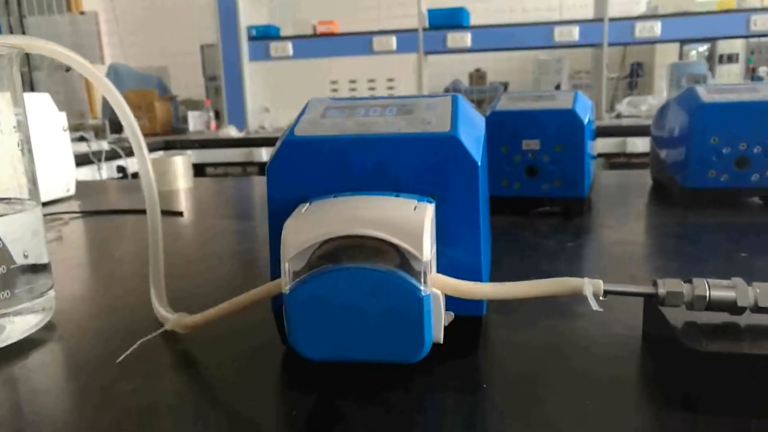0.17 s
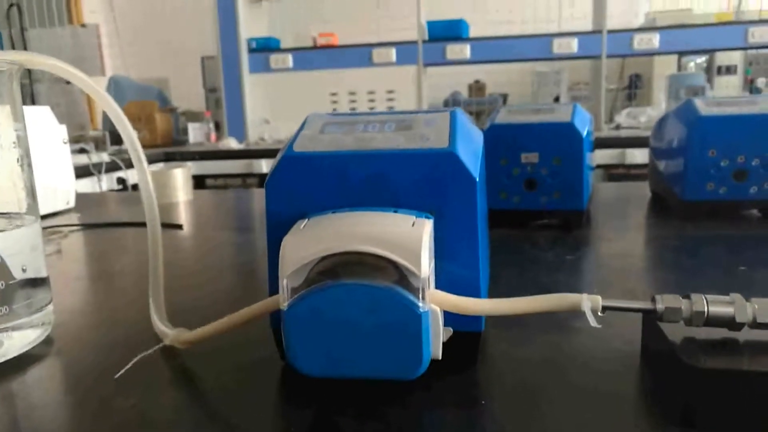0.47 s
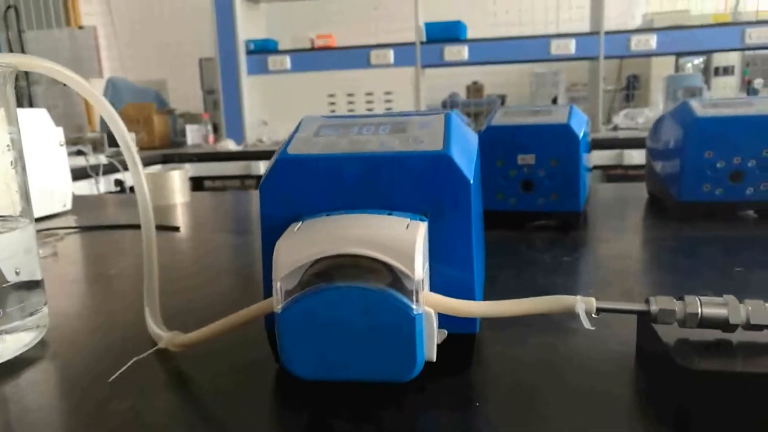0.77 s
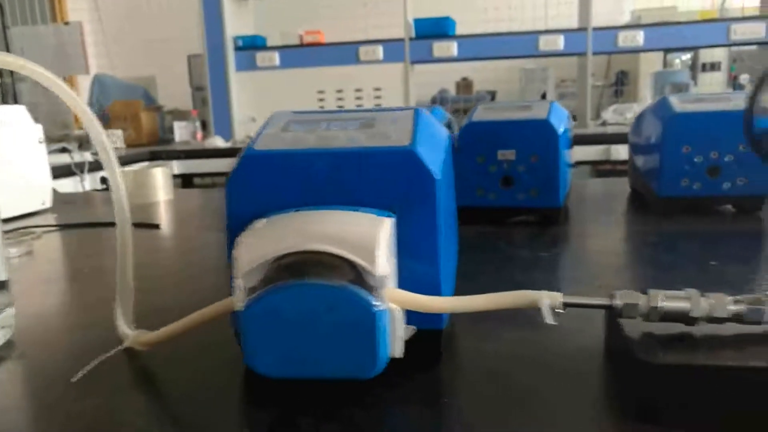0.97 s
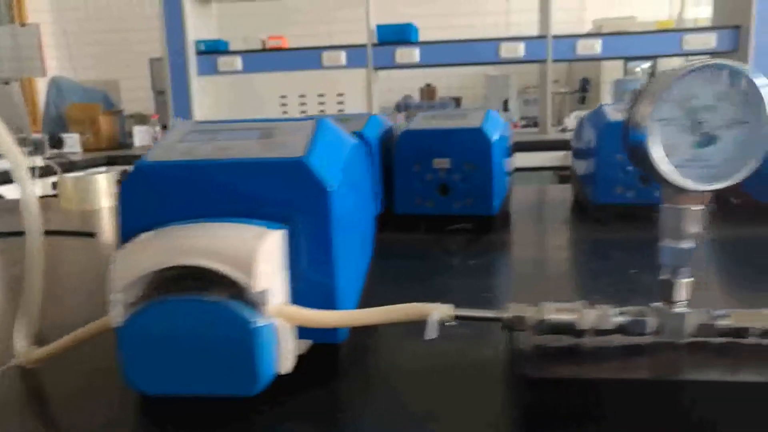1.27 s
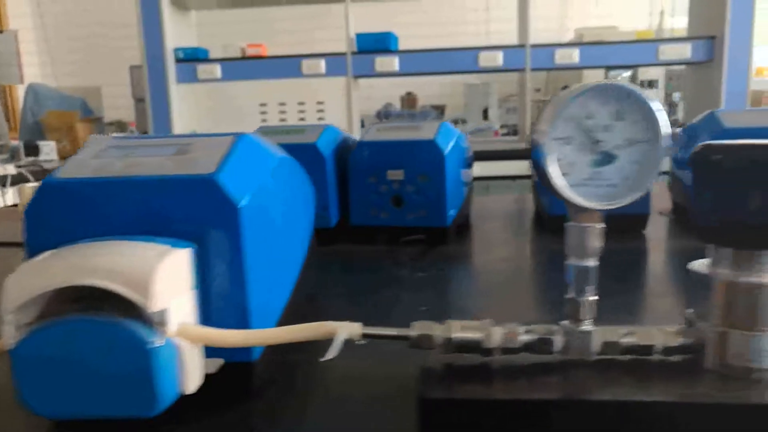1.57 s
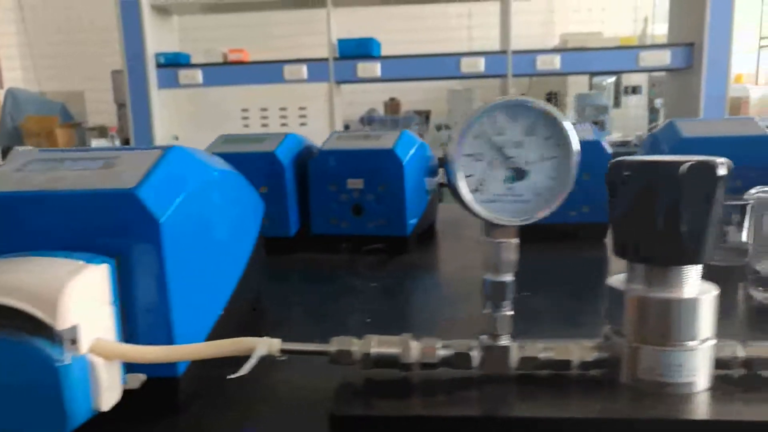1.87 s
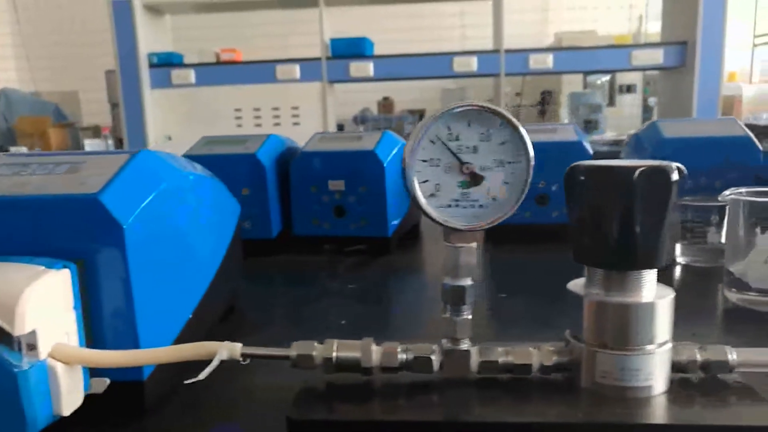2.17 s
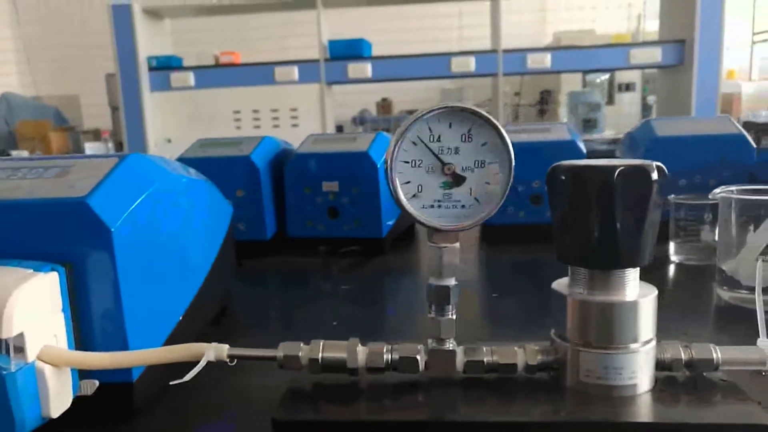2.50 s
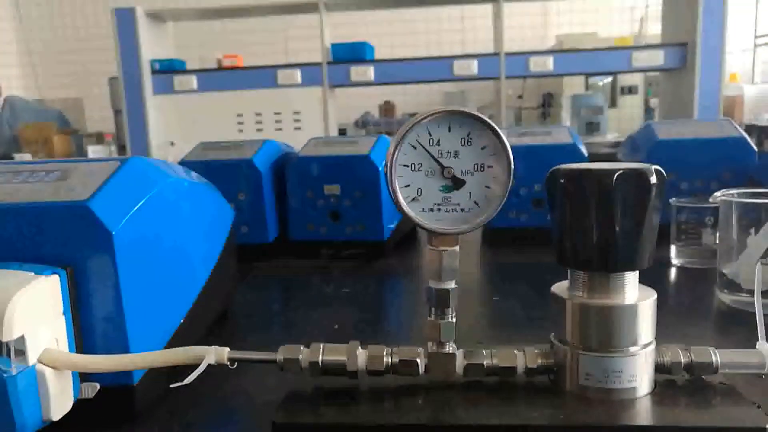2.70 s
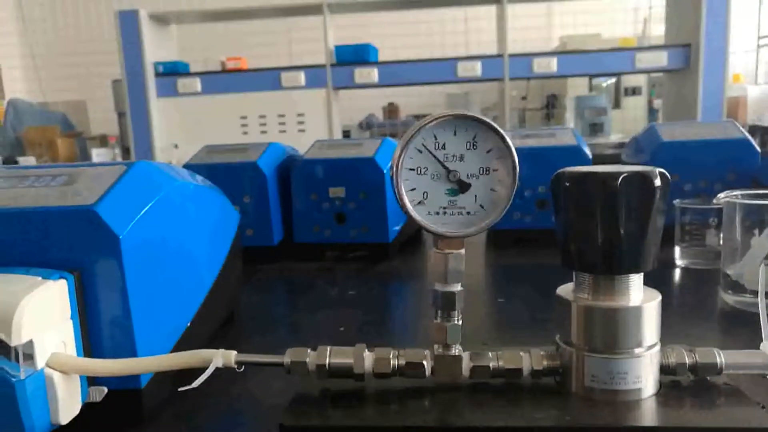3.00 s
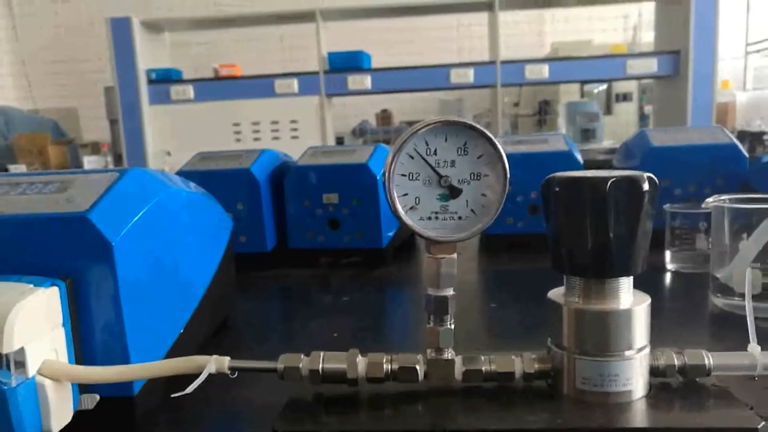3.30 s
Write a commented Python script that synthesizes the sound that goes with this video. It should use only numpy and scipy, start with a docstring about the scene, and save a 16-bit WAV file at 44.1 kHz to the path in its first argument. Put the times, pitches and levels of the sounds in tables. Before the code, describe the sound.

A peristaltic pump on a lab bench snaps about twenty times a second, each click riding a short grainy hiss, over a wavering motor whine; close stereo microphones turn toward a pressure gauge.

```python
"""A peristaltic pump snaps and hisses in a quick, steady beat on a laboratory bench; a cut shortens one beat.
Four rollers take turns: each rubs along the tube with a swell of grainy hiss and snaps off it,
a burst of tiny slips that rings the damped modes of the pump head; small squeaks end the rub.
Under them the stepper motor whines in wavering partials over whir, hum and one soft low rumble.
The microphones turn between the pump and a pressure gauge, which changes the colour of the rubbing."""
import sys
import numpy as np
from scipy import signal
from scipy.fft import rfft, irfft, next_fast_len
from scipy.io import wavfile
from scipy.ndimage import uniform_filter1d

SR = 44100
rng = np.random.default_rng(int(sys.argv[2]) if len(sys.argv) > 2 else 0)


def to_wav(sig):
    """Store sig (one row per channel, or 1-D mono) as 16-bit WAV at the path in sys.argv[1].

    Samples outside -1..1 are clipped; the rate is SR.
    """
    pcm = np.clip(np.atleast_2d(sig), -1, 1) * 32767
    pcm = np.round(pcm).astype(np.int16)
    wavfile.write(sys.argv[1], SR, pcm.T)  # frames by channels


N = 152145

# Centres of the pump head's knock, body, middle and main modes, in Hz.
MODE_GROUPS_HZ = (1150, 1750, 2950, 4000)
PASS_S = 0.0501  # from one roller pass to the next


def amp(db):
    """Decibels to gain."""
    return 10 ** (np.asarray(db) / 20)


def unit(x):
    """Scales to rms 1, over all channels together."""
    return x / np.sqrt(np.mean(abs(x) ** 2) + 1e-20)


def spectrum(table, hz):
    """Reads every column of a table on a log-frequency axis."""
    f, *columns = np.transpose(table)
    return np.array([np.interp(np.log(hz + 1), np.log(f + 1), c) for c in columns])


def curve(table):
    """Reads every column of a table at each sample."""
    s, *columns = np.transpose(table)
    return np.array([np.interp(np.arange(N) / SR, s, c) for c in columns])


def shape(x, gain):
    """Filters by a function of frequency."""
    size = next_fast_len(N + 8192)  # padding keeps the tail from wrapping round
    hz = np.fft.rfftfreq(size, 1 / SR)
    return irfft(rfft(x, size) * gain(hz), size)[..., :N]


def drift(rate_hz, channels=1):
    """Slow random wandering of rms 1: noise rolled off above the rate."""
    noise = rng.standard_normal((channels, N))
    return unit(shape(noise, lambda f: 1 / (1 + (f / rate_hz) ** 2)))


def band(hz, width_hz, channels=1):
    """A narrow, wavering line of noise, rms 1."""
    noise = rng.standard_normal((channels, N))
    return unit(shape(noise, lambda f: 1 / (1 + (2 * (f - hz) / width_hz) ** 2)))


def add(mix, s, sound):
    """Mixes in a sound centred on time s, trimmed at both ends of the mix."""
    start = round(s * SR) - sound.shape[1] // 2
    sound = sound[:, max(-start, 0):]
    part = mix[:, max(start, 0):][:, :sound.shape[1]]
    part += sound[:, :part.shape[1]]


def passes():
    """Times at which a roller leaves the tube; the second run follows a cut that shortens one beat."""
    # Runs of evenly spaced passes. Each row: first pass in seconds, end in seconds.
    runs = [(.0145, 1.08), (1.0935, 3.47)]
    return np.concatenate([np.arange(first, end, PASS_S) for first, end in runs])


def rumble():
    """A soft low rumble swells, holds evenly and dies away: bass noise with its level smoothed."""
    full_s, rise_s, hold_s, decay_s = 0.385, 0.04, 0.11, 0.11
    level_db, top_hz = -49, 108
    t = np.arange(N) / SR - full_s
    level = np.clip(1 + t / rise_s, 0, 1) * np.exp(-np.maximum(t - hold_s, 0) / decay_s)
    noise = shape(rng.standard_normal(N), lambda f: (f / top_hz) ** 1.43 / (1 + (f / top_hz) ** 5))
    power = uniform_filter1d(noise ** 2, size=2000)
    even_noise = noise / np.sqrt(abs(power) + 1e-20)
    return amp(level_db) * level * even_noise


def whir():
    """Steady noise of motor and room, nearly mono in the bass, with a few low hums."""
    # Colour of the noise. Each row: frequency in Hz, relative left and right levels in dB per Hz.
    colour = [(20, -5, 0), (45, -6, -9.5), (141, -4.5, -3.5), (253, 5.5, 4.5), (515, -3.5, -4),
              (830, -0.5, 2), (1014, 8.5, -0.5), (1290, -6.5, -1), (1690, 2, -5), (2400, -11.5, -7.5),
              (2780, -11, -1), (3620, 4.5, -8), (4800, -0.5, -2.5), (5140, -2.5, -10), (6950, -13, -15.5),
              (10200, -23, -6.5), (15300, -13.5, -7.5)]
    # Each row: frequency in Hz, left-right likeness from 0 to 1.
    likeness = [(30, 0.96), (120, 1), (300, 0.68), (600, 0), (1500, 0.41), (15000, 0)]
    # Hums of the room. Each row: frequency in Hz, width in Hz, level in dB.
    hums = [(79, 17, -74.5), (110.2, 2.7, -72), (263.7, 49, -64.5), (355, 19, -71.5)]
    level_db, patch_db = -47, 2.5
    patchiness = amp(patch_db * drift(rate_hz=57))
    a, b = rng.standard_normal((2, N)) * patchiness

    def same(f):
        return np.clip(spectrum(likeness, f)[0], -1, 1)

    right = shape(a, same) + shape(b, lambda f: np.sqrt(1 - same(f) ** 2))
    noise = unit(shape(np.array([a, right]), lambda f: amp(spectrum(colour, f))))
    return amp(level_db) * noise + sum(amp(db) * band(hz, width) for hz, width, db in hums)


def whine(turn):
    """Stepping tones of the motor, swelling and fading as the microphones move through them."""
    # Partials by multiple of the base tone. Each row: time in seconds, left dB, right dB.
    partials = {1: [(0, -50.5, -46.5), (.9, -50, -47.5), (1.6, -48.5, -50), (2.3, -51.5, -55),
                (3.45, -50.5, -53.5)], 4: [(0, -92, -52.5), (.9, -60.5, -56), (1.25, -42, -47.5),
                (1.6, -39, -53), (1.95, -45, -77), (2.3, -41.5, -57), (2.7, -40.5, -52),
                (3.45, -39.5, -53)], 5: [(0, -43.5, -61), (1.1, -44, -61), (1.4, -59, -72), (2.3, -51, -73),
                (3.45, -49.5, -71)]}
    # Thin whistles of the motor drive. Each row: frequency in Hz, width in Hz, level in dB.
    whistles = [(13000, 32, -62), (13200, 31, -62), (12900, 490, -57)]
    base_hz, wander_rad, flutter = 915.62, 0.12, 0.16
    pump_lag_s, gauge_lag_s = 0.0003, 0.00037  # left behind right, facing pump or gauge
    t, out = np.arange(N) / SR, np.zeros((2, N))
    lag = pump_lag_s + (gauge_lag_s - pump_lag_s) * turn
    angle = 2 * np.pi * base_hz * np.array([t - lag, t]) + wander_rad * drift(rate_hz=8.9)
    for multiple, levels in partials.items():
        tone = np.sqrt(2) * np.sin(multiple * angle)
        out += amp(curve(levels)) * tone * (1 + flutter * drift(rate_hz=67))
    return out + sum(amp(db) * band(hz, width, channels=2) for hz, width, db in whistles)


def squeaks(slipping, count=24):
    """The tube sticks and slips in tiny high squeaks: random kicks to short rings at many pitches."""
    low_hz, high_hz, per_s = 9370, 13000, 1700  # kicks per second where slipping is 1, over all pitches
    ring_s, level_db = 0.00045, -54.5
    t, out = np.arange(400) / SR, np.zeros((2, N))
    for hz in np.linspace(low_hz, high_hz, count):
        kicked = rng.random(N) < slipping * per_s / count / SR
        slips = kicked * rng.standard_normal((2, N))
        ring = t * np.exp(-t / ring_s) * np.sin(2 * np.pi * hz * t)
        out += signal.oaconvolve(slips, ring[None])[:, :N]
    return amp(level_db) * unit(out)


def rubbing():
    """Grainy hiss swells as a roller squeezes the tube and ends in squeaks shortly after the snap."""
    # How hard each roller rubs, in relative dB.
    roller_db = [-0.24, 0.34, -0.63, -1.1]
    # Colour of the hiss. Each row: frequency in Hz, relative left and right levels in dB per Hz.
    colour = [(560, -13, -10), (1550, -1, -7), (2120, -6.5, -44), (2720, -7.5, -40), (4500, -3.5, -5),
              (5460, -13, -10.5), (8000, -11.5, -14.5), (9950, -2, -10), (12800, -9, 1), (13500, -1, -1),
              (15600, 0.5, -3.5)]
    level_db, grain_db, scatter_db = -41.5, 1.6, 1.5
    rise_s, end_s, release_s = 0.02, 0.014, 0.0034  # the end comes this long after the snap
    squeak_late_s, squeak_spread_s = 0.0115, 0.0023  # squeaks bunch this long after the snap
    t, level, slipping = np.arange(N) / SR, np.zeros(N), np.zeros(N)
    for k, s in enumerate(passes()):
        rise = 1 + (t - s) / rise_s
        release = (s + end_s - t) / release_s
        swell = np.clip(np.minimum(rise, release), 0, 1)
        on = swell > 0
        level += amp(roller_db[k % len(roller_db)]) * swell
        slipping[on] += np.exp(-((t[on] - s - squeak_late_s) / squeak_spread_s) ** 2)
    grain_level = amp(grain_db * drift(rate_hz=830) + scatter_db * drift(rate_hz=62))
    grains = rng.standard_normal((2, N)) * grain_level
    hiss = unit(shape(level * grains, lambda f: amp(spectrum(colour, f))))
    return amp(level_db) * hiss + squeaks(slipping)


def turned(x, turn):
    """Blends the rubbing toward another colour as the microphones turn from the pump."""
    # Colour facing the gauge. Each row: frequency in Hz, change in dB.
    colour = [(1000, -9), (3000, 5), (4400, 1), (9500, 1.5), (12000, 0), (15000, -8)]
    return (1 - turn) * x + turn * shape(x, lambda f: amp(spectrum(colour, f)))


def crunch():
    """One snap: a millisecond of tiny slips with a fairly even spectrum, inside a fainter rattle."""
    evenness, slip_s, rattle, rattle_s = 0.53, 0.001, 0.023, 0.0046
    away = abs(np.arange(-900, 900)) / SR  # both build up before the centre and die away after it
    noise = rng.standard_normal((3, len(away)))
    z = rfft(noise[0] * np.exp(-away / slip_s))
    slips = irfft(z / (abs(z) + 1e-9) ** evenness)
    return slips / np.linalg.norm(slips) + rattle * np.exp(-away / rattle_s) * noise[1:]


def ringing(x, ring_db):
    """Lifts or lowers the modes under the main one: each snap catches them differently."""
    f = np.fft.rfftfreq(x.shape[1], 1 / SR)
    lift = list(zip(MODE_GROUPS_HZ, [*ring_db, 0]))
    return irfft(rfft(x) * amp(spectrum(lift, f)))


def head(f):
    """Response of the pump head: damped modes of a body too small to radiate bass, one of which bounces."""
    # Each row: frequency in Hz, width in Hz, relative level in dB.
    resonances = [(1169, 210, 1), (1690, 306, -0.5), (2673, 136, -10.5), (3216, 550, -7.5), (4124, 423, 5),
                  (6700, 870, -36), (9700, 2600, -16), (12070, 3000, -12.5)]
    lowest_hz = 1015
    bounce_gain, bounce_s, bounce_width_hz = 0.64, 0.003482, 230
    modes = sum(amp(db) / (1 + 1j * (f * f - hz * hz) / (width * f + 1)) for hz, width, db in resonances)
    # the body mode answers a second time just after each snap
    near_body = np.exp(-((f - MODE_GROUPS_HZ[1]) / bounce_width_hz) ** 2)
    bounce = bounce_gain * near_body * np.exp(-2j * np.pi * f * bounce_s)
    return modes * (1 + bounce) / np.sqrt(1 + (lowest_hz / (f + 1)) ** 8)


def snaps():
    """Each roller lets go of the tube with a snap or a faint tick and rings the pump head, mostly on the left."""
    # Clear snaps. Each row: time in seconds, relative strength in dB,
    # then extra ring of the knock, body and middle modes in dB.
    clear_snaps = [(0.0139, 1.5, -3, 3, 2.5), (0.064, -2, -15, -6.5, 14), (0.111, -5, -16, -10.0, 3),
                   (0.2141, 0, -2.5, 4.5, 7.5), (0.2647, -3.5, -9.0, 1.5, 12.5), (0.4143, -3.5, 5.5, 8, 10),
                   (0.4653, -1, -7, 0.5, 7.5), (0.6151, 2, -0.5, 1, -7), (0.6653, -2, -14.0, 3, 5.5),
                   (0.7112, -6.5, -13.0, -18, -9.5), (0.8156, -1, 1.5, -1, 6), (0.8659, -1, -10, 1.5, 5),
                   (0.9666, -3, -8, 3.5, -2), (1.016, -2, -2.5, 2, 10), (1.0663, -1, -8, 3.5, 8),
                   (1.1432, -7, -21, -13, 7), (1.194, 1, -4.5, 3.5, -2), (1.244, 0.5, -18, 0, -2),
                   (1.3412, -9.5, -9, -10, 7), (1.3931, -1.5, 1, 2.5, 5.5), (1.4433, -1.5, -24, 1, 8.5),
                   (1.5447, -4.5, -26, -27, -5), (1.594, -0.5, -4.5, -4, 1.5), (1.6439, -5, -25, -10, 19),
                   (1.6934, -8.5, -9, -22, 12.5), (1.7444, -9, -21, -17, 9), (1.795, -3.5, -2, 6, 10),
                   (1.8443, -8, -18, -11, 22.5), (1.9452, -6.5, -11.5, -5, 13.5), (1.9942, -8, 3, 5, 16.5),
                   (2.045, -3, -15, 0, 14.5), (2.146, -4, -8.5, 5, 7.5), (2.1959, -6, 2.5, 7, 3),
                   (2.2464, -3.5, -10, 1.5, 18), (2.3458, -4.0, -14, -10, 12), (2.3955, -4, -4.5, 1.5, 8),
                   (2.4462, -3, -10, 0.5, 13.5), (2.5476, -10, -7, -2, 22), (2.5965, -6.5, 3.5, 0, 19),
                   (2.6468, -1, -16, -4, 13.5), (2.748, -9, -7.0, -8, 18.5), (2.7969, -6.5, -1, 6, 20.5),
                   (2.8469, -2.5, -21, -1.5, 13), (2.9474, -12.0, -15.5, 0, 23), (2.9965, -3.5, 1, 2, 12),
                   (3.048, -2, -9, 2.5, 11.5), (3.1476, -10.5, -13, 3, 12), (3.1974, -4, 1, 1.5, 8),
                   (3.2479, -2.0, -15, 1, 14), (3.3971, -4, -2, 4.5, 11.5), (3.4477, -2.5, -27, -9, 13.5)]
    # Snap at the right microphone. Each row: frequency in Hz, dB against the left.
    right_db = [(1100, 0), (1700, -10.5), (2900, -11.5), (4200, -9), (6000, -20.5), (9000, 2.5),
                (12000, -9), (15000, -8)]
    # Each row: frequency in Hz, radians by which the left microphone leads (negative: the right leads).
    left_lead = [(1100, 0), (1900, -.3), (2300, -1.4), (2900, -1.7), (4300, -1.7), (9000, -1.6)]
    # The other passes only tick: mean strength in dB, then extra ring of knock, body and middle in dB.
    tick = (-12.5, -10, -16, 6)
    level_db, tick_scatter_db = 6.5, 2.5
    force, clear_s = np.zeros((2, N)), np.transpose(clear_snaps)[0]
    ticks = []
    for s in passes():
        if min(abs(clear_s - s)) > PASS_S / 2:
            ticks.append((s, tick[0] + tick_scatter_db * rng.standard_normal(), *tick[1:]))
    for s, db, *ring_db in list(clear_snaps) + ticks:
        add(force, s, amp(db) * ringing(crunch(), ring_db))
    left, right = amp(level_db) * shape(force, head)

    def to_right(f):
        return amp(spectrum(right_db, f)[0]) * np.exp(-1j * spectrum(left_lead, f)[0])

    return np.array([left, shape(right, to_right)])


def room(x):
    """A faint, short tail from the laboratory: exponentially dying noise on each side."""
    level_db, t60_s, onset_s = -12.5, 0.29, 0.0012
    t = np.arange(SR // 2) / SR
    decay = np.exp(-np.log(1000) * t / t60_s) * np.minimum(t / onset_s, 1)
    tail = rng.standard_normal((2, len(t))) * decay
    return amp(level_db) * signal.fftconvolve(x, tail / np.linalg.norm(tail[0]), axes=1)[:, :N]


def scene():
    """The rubbing changes colour as the microphones turn; whine and room carry on."""
    # Each row: time in seconds, turn from 0 (facing the pump) to 1 (facing the gauge).
    turn_path = [(0, 0.4), (.7, 0.12), (1.15, 0.39), (1.65, 0.99), (3.45, 0.77)]
    turn = np.clip(curve(turn_path)[0], 0, 1)
    pump = snaps() + turned(rubbing(), turn)
    return pump + room(pump) + whine(turn) + whir() + rumble()


def record(dry):
    """The recorder's band limit: a steep low-pass."""
    edge_hz = 15900
    taps = signal.firwin(401, edge_hz, window=("kaiser", 8), fs=SR)
    return signal.oaconvolve(dry, taps[None], "same")


dry = scene()
out = record(dry)
to_wav(out)
```